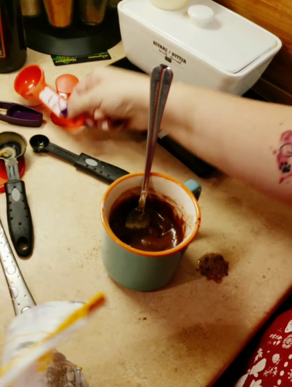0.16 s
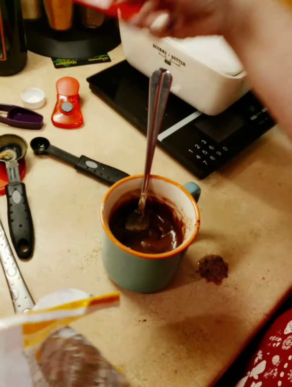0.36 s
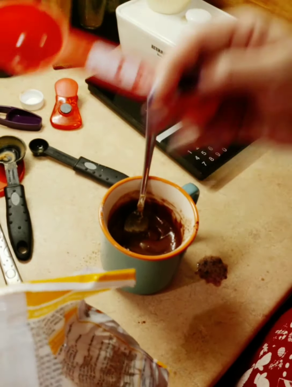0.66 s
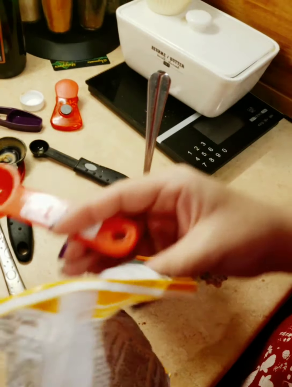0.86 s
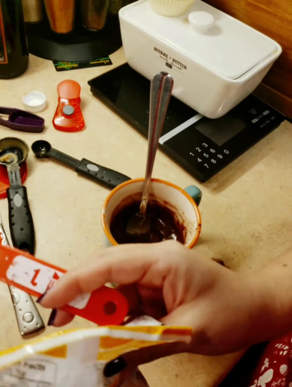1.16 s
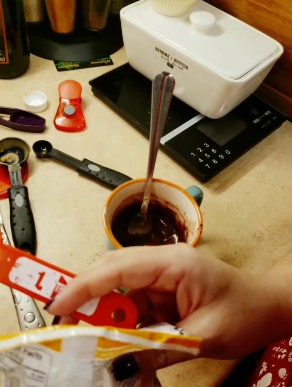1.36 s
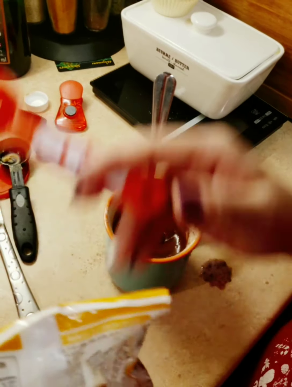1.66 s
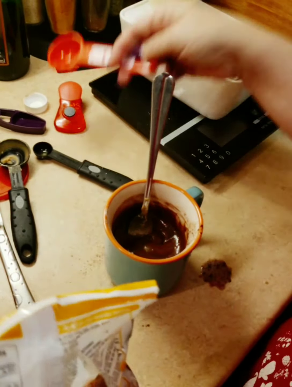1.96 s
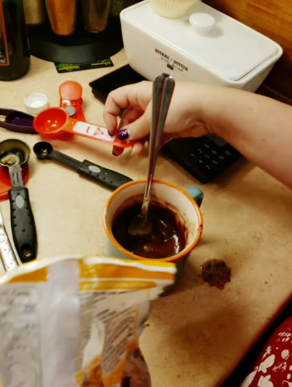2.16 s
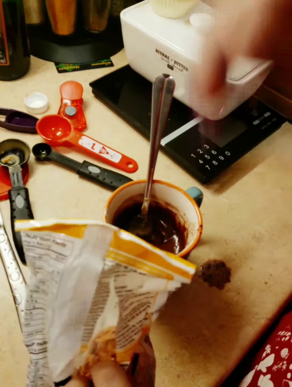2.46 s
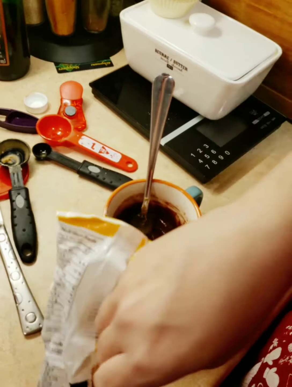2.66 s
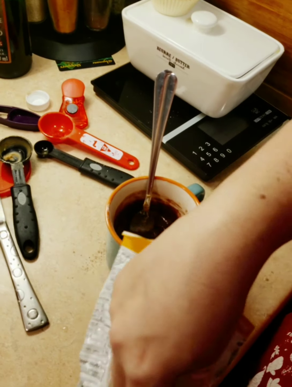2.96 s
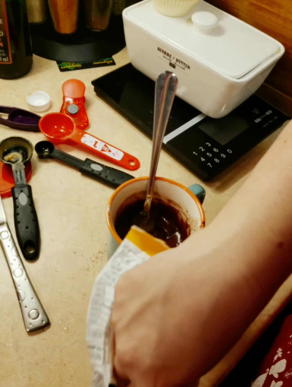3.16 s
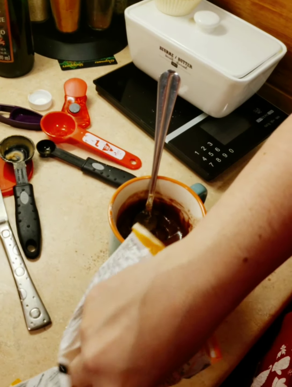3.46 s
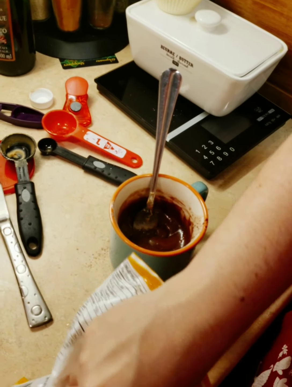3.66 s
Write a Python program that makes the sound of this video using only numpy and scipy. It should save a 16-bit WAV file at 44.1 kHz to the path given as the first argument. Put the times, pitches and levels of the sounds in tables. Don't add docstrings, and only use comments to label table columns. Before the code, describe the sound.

Close plastic bag crackling, with a plastic spoon clattering briefly on a kitchen counter

```python
import sys
import numpy as np
from scipy import signal
from scipy.fft import rfft, irfft
from scipy.io import wavfile
from scipy.ndimage import uniform_filter1d

SR = 44100
rng = np.random.default_rng(int(sys.argv[2]) if len(sys.argv) > 2 else 0)


def wav_record(signal):
    frames = np.transpose(np.atleast_2d(signal))
    bounded = np.clip(frames, -1, 1)
    quanta = np.round(bounded * 32767).astype(np.int16)
    wavfile.write(sys.argv[1], SR, quanta)


def convert_level_to_amplitude(level_db):
    exponent = np.asarray(level_db, float) / 20
    return 10 ** exponent


N = 167580

# f/Hz, level/dB
AIR_COLOUR = [(30, 2), (300, -6), (1500, -8), (2100, -2), (3200, -14), (6000, -22), (12000, -42)]
# f/Hz, T60/s
ROOM_DECAY = [(300, 0.23), (2000, .22), (6000, 0.19), (13000, 0.16)]
# t/s, level/dB, ring f/Hz, ring level above knock/dB
SPOON_HITS = [
    (2.245, -21, 1436, -9),
    (2.276, -27, 1492, -1),
    (2.363, -38, 5970, 9),
    (2.437, -22.5, 1405, -1),
    (2.553, -34.5, 4710, -1),
]
# f/Hz, level/dB
KNOCK_COLOUR = [(150, -14), (700, 1.5), (4500, -2), (6500, -18), (15000, -26.5)]
# t/s, level/dB, f/Hz
THUMPS = [(0.336, -33, 196), (0.338, -22, 490), (1.016, -36, 115), (1.103, -31, 188), (1.339, -27.5, 190),
          (1.369, -18.5, 234), (1.427, -23, 146), (1.427, -15, 520), (1.577, -30, 130), (1.605, -22, 118),
          (1.604, -16.5, 400), (1.801, -21.5, 147), (2.056, -23, 230), (2.247, -20, 222), (2.245, -18, 427),
          (2.248, -19, 840), (2.438, -32, 495), (2.999, -13, 488), (3.236, -21.5, 382), (3.49, -18, 495),
          (3.645, -27, 240)]
# start t/s, length/s, level/dB, fine creases above/dB, rumble above/dB
SQUEEZES_LIGHT = [(0, 0.031, -33, -12, -0.5), (0.055, 0.14, -43.5, -11.5, -9), (0.174, 0.14, -57, -2, -4),
                  (0.299, 0.09, -46.5, -3.5, -1.5), (0.389, 0.23, -51, -12, -6),
                  (0.626, 0.287, -63, -12, -4.5), (1, 0.095, -48.5, -9.5, -1.5),
                  (1.079, 0.23, -34.5, -6, -10.5), (1.304, 0.23, -40, -6.5, -4.5),
                  (1.528, 0.2, -38.5, -8, -8.5), (1.721, 0.16, -36, -7, -9), (1.816, 0.35, -48.5, -8.5, -5),
                  (2.146, 0.1, -38.5, -14, -10.5)]
SQUEEZES_FIRM = [(2.245, 0.1, -33.5, -11, -3), (2.347, .055, -22, -12.5, -17),
                 (2.435, 0.16, -35.5, -7.5, -7), (2.602, 0.17, -48, -5, -12),
                 (2.788, 0.076, -26.5, -5.5, -12.5), (2.853, 0.12, -34.5, -8.5, -6),
                 (2.972, 0.041, -30.5, -11, -14), (2.997, 0.052, -25.5, -11, -8.5),
                 (3.036, 0.18, -29.5, -8, -12.5), (3.227, 0.086, -27.5, -9, -14.5),
                 (3.292, 0.1, -25, -4.5, -11), (3.375, 0.11, -31.5, -8, -15.5),
                 (3.456, 0.093, -27, -7, -14), (3.545, 0.11, -41.5, -11, -6.5),
                 (3.627, 0.1, -26, -11.5, -12), (3.703, 0.12, -34, -9.5, -24)]
# f/Hz, level/dB
RUMBLE_COLOUR = [(30, -28), (70, -5.5), (230, -0.5), (500, -0.5), (1000, -16), (3000, -63)]
# f/Hz, level/dB
FILM_COLOUR = [(150, -38.5), (600, -12), (1200, -8.5), (2300, 0.5), (3600, 5), (6000, -8.5), (15000, -50)]
# f/Hz, level/dB
TICK_COLOUR = [(2500, -29), (5000, 2.5), (8000, 0.5), (15500, -8)]
# t/s, body level/dB, panel f/Hz, tick level above body/dB
SNAPS_HELD = [(0.0474, -23.5, 2250, -8), (0.0899, -11.5, 2810, -26), (0.107, -39, 2800, 5),
              (0.1381, -33, 2220, -28), (0.188, -36.5, 2800, 0), (0.3408, -19, 1760, -15),
              (0.3529, -15.5, 2120, -10), (0.4209, -32.5, 2630, -13), (0.4719, -14.5, 2870, -19.5),
              (0.5071, -16, 1670, -10.5), (0.541, -20.5, 2660, -31), (0.5478, -32, 2210, -3),
              (0.58, -32, 2720, -5.5), (0.597, -30, 1290, -22), (0.634, -18.5, 2790, -39),
              (0.6428, -24.5, 1220, -13), (0.6814, -33, 2380, -32), (0.7056, -47, 3000, -13),
              (0.8592, -40, 3040, -21), (0.891, -37, 2680, -29), (0.7224, -21.5, 2730, -11),
              (0.7632, -12.5, 1960, -15), (0.8741, -29.5, 2140, -50), (1.0092, -30, 1180, -19),
              (1.0218, -28, 2210, -21)]
# t/s, body level/dB, tick level above body/dB
SNAPS_OPENED = [(1.0989, -13, -12), (1.1116, -11, -19), (1.1161, -29, -8), (1.1387, -13.5, -34),
                (1.173, -33, -18), (1.194, -18.5, -10.5), (1.2314, -16.5, -8.5), (1.2569, -15.5, -25),
                (1.324, -18.5, -34), (1.3419, -19.5, -28), (1.3706, -14.5, -21), (1.4285, -18, -16),
                (1.4437, -14, -23), (1.487, -16.5, -21), (1.5408, -11.5, -20), (1.5822, -13, -30),
                (1.6057, -19.5, -16), (1.6593, -25.5, -33), (1.7222, -17, -8.5), (1.7381, -16.5, -13),
                (1.747, -25.5, 1), (1.7777, -21, -26), (1.8056, -13.5, -17), (1.8326, -14.5, -9.5),
                (1.9847, -23, -37), (2.0214, -24, -9.5), (2.045, -21, -28), (2.09, -23.5, -6.5),
                (2.1521, -22, -4.5), (2.178, -13.5, -22)]
# t/s, body level/dB, panel f/Hz, tick level above body/dB
SNAPS_RUMMAGED = [(2.6872, -19, 2300, -23), (2.7764, -29.5, 2780, -9), (2.799, -18, 1810, -21),
                  (2.8052, -32, 2020, -14), (2.8134, -14, 2600, -7), (2.8232, -7.5, 2400, -17),
                  (2.8538, -14, 2140, -15), (2.86, -6.5, 2130, -15), (2.932, -40, 2430, -7),
                  (2.9723, -12, 2520, -9), (3.0016, -9, 2380, -11), (3.0085, -11.5, 1070, -24),
                  (3.0150, -7.5, 2380, -12), (3.042, -19, 2500, -18), (3.084, -16.5, 2370, -8.5),
                  (3.1, -16, 2100, -12), (3.1357, -13.5, 2660, -11), (3.1770, -11.5, 2360, -17),
                  (3.214, -21, 2660, -10), (3.229, -21, 2170, -21), (3.2392, -13.5, 2160, -12),
                  (3.2531, -15, 2400, -11), (3.2588, -10, 1930, -14), (3.275, -20, 2330, -13),
                  (3.3032, -8.5, 3060, -15.5), (3.318, -23, 2300, 2), (3.3260, -10.5, 2500, -20),
                  (3.3398, -14, 1950, -8), (3.349, -15, 2900, -26), (3.3827, -16, 2040, -17),
                  (3.4, -19, 2200, -16), (3.4170, -24, 2000, -20), (3.4306, -16, 2140, -20),
                  (3.4512, -11.5, 2350, -17), (3.4740, -22, 2000, -12), (3.5053, -14, 1280, -20),
                  (3.5723, -24, 1540, -29), (3.5974, -26, 2840, -8.5), (3.623, -24.5, 1860, -28),
                  (3.6378, -27, 2310, -26), (3.6472, -14, 1950, -24), (3.6641, -8, 2100, -14),
                  (3.6828, -16.5, 2200, -5.5), (3.7418, -15.5, 2070, -20), (3.778, -18, 2700, -11.5)]
# t/s, level/dB
LONE_TICKS = [(1.21, -38), (1.525, -45), (1.576, -44), (1.617, -33), (1.659, -43), (1.821, -34),
              (2.246, -35), (1.871, -46), (1.946, -46), (2.048, -49), (2.067, -46), (2.2098, -40),
              (2.294, -46), (2.4433, -26), (2.495, -41), (2.5498, -38), (2.648, -49.5), (2.704, -47),
              (2.927, -47), (3.028, -32), (3.063, -36), (3.129, -37), (3.186, -35), (3.293, -37),
              (3.465, -42)]

AIR_DB, ROOM_DB, TICK_ROOM_DB = -61, -6, -8
BODY_DB, TICK_DB, THUMP_DB, CRACKLE_DB = -11.5, -4.5, -11.5, -3
PANEL_T60_S, TICK_T60_S, KNOCK_T60_S, SPOON_T60_S = 0.022, 0.011, 0.058, 0.17
PANEL_HZ, TICK_HZ = (1400, 3280), (3860, 12200)
PANEL_WIDTH_HZ, PANEL_SHARE = 1110, 0.58
CRACK = 4.4
THUMP_TURNS = 1.47
CRACKLES_PER_S, SPREAD_DB = (500, 1000), (5.3, 4.1)
TICKS_PER_S, TICK_SPREAD_DB = 480, 4.8
GRIP_S, RELEASE_S = 0.015, 0.047
HOLLOW_HZ, HOLLOW_GAIN = 231, 1
NOTCH_HZ, NOTCH_WIDTH_HZ, NOTCH_DEPTH = 11050, 900, 0.7


def evened(x):
    return x / np.sqrt(np.mean(x ** 2) + 1e-20)


def read(points, hz):
    f, value = np.transpose(points)
    return np.interp(np.log(hz + 1), np.log(f + 1), value)


def add(mix, s, sound):
    part = mix[round(s * SR):][:len(sound)]
    part += sound[:len(part)]


def coloured(x, points):
    half = np.log(convert_level_to_amplitude(read(points, np.fft.rfftfreq(4096, 1 / SR))))
    log_gain = np.r_[half, half[-2:0:-1]]
    phase = signal.hilbert(log_gain).imag
    taps = np.fft.ifft(np.exp(log_gain - 1j * phase)).real
    return signal.oaconvolve(x, taps[:2048])[:len(x)]


def burst(noise, t60, colour, hz=0):
    t = np.arange(len(noise)) / SR
    x = coloured(noise * convert_level_to_amplitude(-60 * t / t60), colour)
    if hz:
        early = t[:200]
        panel = np.exp(-np.pi * PANEL_WIDTH_HZ * early) * np.sin(2 * np.pi * hz * early)
        ring = np.convolve(x, panel)[:len(t)]
        x = PANEL_SHARE * evened(ring) + (1 - PANEL_SHARE) * evened(x)
    return x / np.sqrt(np.mean(x[:130] ** 2))


def air():
    spectrum = rfft(rng.standard_normal(N)) * convert_level_to_amplitude(read(AIR_COLOUR, np.fft.rfftfreq(N, 1 / SR)))
    return convert_level_to_amplitude(AIR_DB) * evened(irfft(spectrum, N))


def room(x):
    taps, size = np.zeros((3, SR // 2)), (3, SR // 40 - 6)
    at = 90 + 20 * np.arange(size[1]) + rng.integers(0, 20, size)
    np.put_along_axis(taps, at, rng.choice([-1., 1.], size), 1)
    hz, t, z = signal.stft(taps, SR, nperseg=128)
    decay = convert_level_to_amplitude(-60 * t / read(ROOM_DECAY, hz)[:, None])
    tails = signal.istft(z * decay, SR, nperseg=128)[1]
    tails = tails / np.linalg.norm(tails, axis=1, keepdims=True)
    turn = 2 * np.pi * (23 * np.arange(N) / SR + np.arange(3)[:, None] / 3)
    fed = x * np.sqrt((1 + np.cos(turn)) / 3)
    return signal.fftconvolve(fed, tails, axes=1)[:, :N].sum(0)


def spoon():
    out, t = np.zeros(N), np.arange(4000) / SR
    for s, db, hz, ring_db in SPOON_HITS:
        noise = rng.standard_normal((2, 4000))
        wobble = np.cumsum(0.13 * noise[1])
        decay = convert_level_to_amplitude(ring_db - 60 * t / SPOON_T60_S * np.sqrt(hz / 1500))
        ring = decay * np.sin(2 * np.pi * hz * t + wobble)
        add(out, s, convert_level_to_amplitude(db) * (burst(noise[0], KNOCK_T60_S, KNOCK_COLOUR) + ring))
    return out


def thumps():
    out = np.zeros(N)
    for s, db, hz in THUMPS:
        turns = np.arange(0, 8, hz / SR)
        wobble = np.cumsum(0.067 * rng.standard_normal(len(turns)))
        envelope = np.minimum(turns * 2, 1) * np.exp(-turns / THUMP_TURNS)
        add(out, s, convert_level_to_amplitude(db + THUMP_DB) * 2 * np.sin(2 * np.pi * turns + wobble) * envelope)
    return out


def swarm(per_s, spread_db, shapes):
    when, big = rng.random(N), rng.exponential(1, N)
    pick, slow = rng.integers(0, len(shapes), N), rng.standard_normal(N)
    drift = uniform_filter1d(uniform_filter1d(slow, 500), 500)
    clumps = np.exp(0.3 * evened(drift))
    size = convert_level_to_amplitude(spread_db * np.minimum(big, 3)) * (when < clumps * per_s / SR)
    layers = (signal.oaconvolve(size * (pick == k), shape)[:N] for k, shape in enumerate(shapes))
    return evened(sum(layers))


def crackle():
    t, noise = np.arange(N) / SR, rng.standard_normal((2, 30, 1500))
    squeezes = np.array(SQUEEZES_LIGHT + SQUEEZES_FIRM)
    start, length, effort_db, fine_db, rumble_db = squeezes.T[..., None]
    grip = np.minimum((t - start) / GRIP_S, (start + length - t) / RELEASE_S)
    level = convert_level_to_amplitude(effort_db + CRACKLE_DB) * np.clip(grip, 0, 1)
    firm = 1 * (t > SQUEEZES_FIRM[0][0])

    panels = [burst(n, PANEL_T60_S, FILM_COLOUR, hz) for n, hz in zip(noise[0], np.geomspace(*PANEL_HZ, 30))]
    ticks = [burst(n, TICK_T60_S, TICK_COLOUR, hz) for n, hz in zip(noise[1], np.geomspace(*TICK_HZ, 30))]
    rubs = [burst(n, 0.031, RUMBLE_COLOUR) for n in rng.standard_normal((20, 2000))]

    body = swarm(np.take(CRACKLES_PER_S, firm), np.take(SPREAD_DB, firm), panels)
    tick = swarm(TICKS_PER_S, TICK_SPREAD_DB, ticks)
    rumble = swarm(800, 2.0, rubs)
    low = level.sum(0) * body + (level * convert_level_to_amplitude(rumble_db)).sum(0) * rumble
    return low, (level * convert_level_to_amplitude(fine_db)).sum(0) * tick


def snaps():
    body, tick = np.zeros((2, N))
    for s, db, *hz, tick_db in SNAPS_HELD + SNAPS_OPENED + SNAPS_RUMMAGED:
        noise = rng.standard_normal((2, 1500))
        any_hz = rng.uniform(*PANEL_HZ, 2).mean()
        noise[:, 0] = CRACK
        rattle = burst(noise[0], PANEL_T60_S, FILM_COLOUR, hz[0] if hz else any_hz)
        add(body, s, convert_level_to_amplitude(db + BODY_DB) * rattle)
        add(tick, s, convert_level_to_amplitude(db + tick_db + TICK_DB) * burst(noise[1], TICK_T60_S, TICK_COLOUR))
    for s, db in LONE_TICKS:
        add(tick, s, convert_level_to_amplitude(db) * burst(rng.standard_normal(1500), TICK_T60_S, TICK_COLOUR))
    return body, tick


def scene():
    small_body, small_tick = crackle()
    body, tick = snaps()
    low = body + small_body + thumps() + spoon()
    high = tick + small_tick
    wet = room(convert_level_to_amplitude(ROOM_DB) * low + convert_level_to_amplitude(TICK_ROOM_DB) * high)
    wet = signal.lfilter(*signal.butter(2, 200, "high", fs=SR), wet)
    hollow = HOLLOW_GAIN * signal.lfilter(*signal.iirpeak(HOLLOW_HZ, 10, SR), low)
    mix = low + hollow + high + wet + air()
    return signal.lfilter(*signal.butter(2, 45, "high", fs=SR), mix)[None]


def band_limit(x):
    return signal.sosfilt(signal.butter(12, 16810, fs=SR, output="sos"), x)


def record(dry):
    b, a = signal.iirpeak(NOTCH_HZ, NOTCH_HZ / NOTCH_WIDTH_HZ, SR)
    dipped = dry - NOTCH_DEPTH * signal.lfilter(b, a, dry)
    soft = 0.6 * np.tanh(dipped / 0.6)
    edge = signal.firwin(255, 15550, window=("kaiser", 5), fs=SR)
    mix = signal.oaconvolve(soft, edge[None], "same")
    return band_limit(mix)


dry = scene()
out = record(dry)
wav_record(out)
```